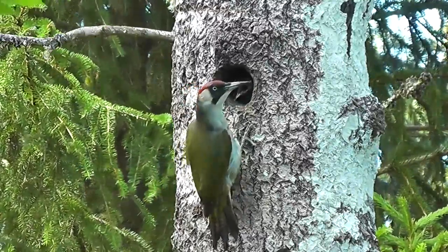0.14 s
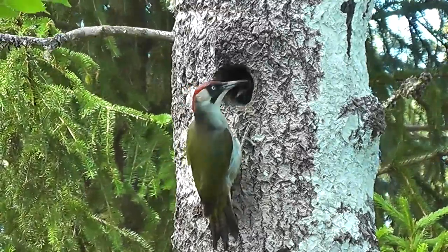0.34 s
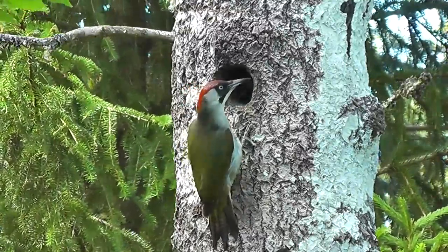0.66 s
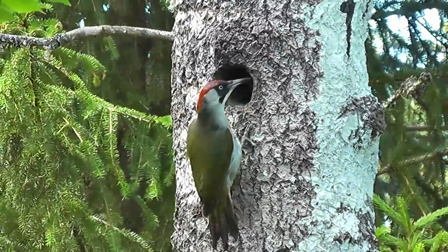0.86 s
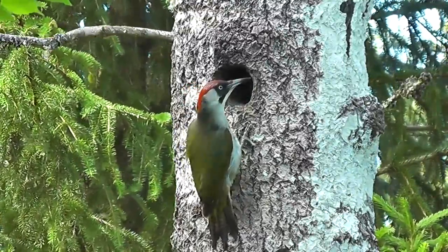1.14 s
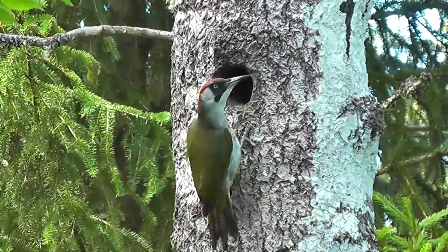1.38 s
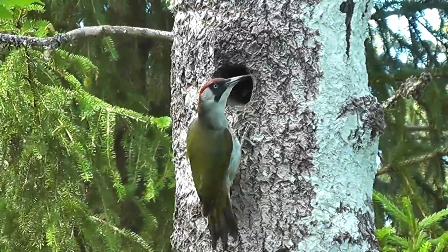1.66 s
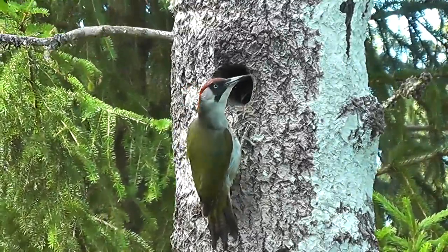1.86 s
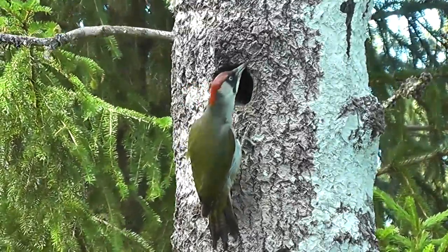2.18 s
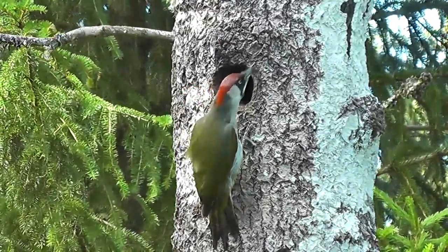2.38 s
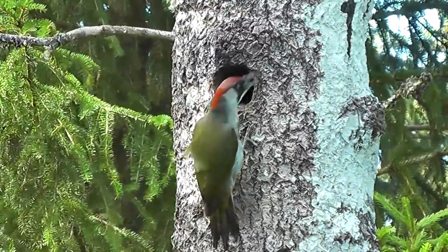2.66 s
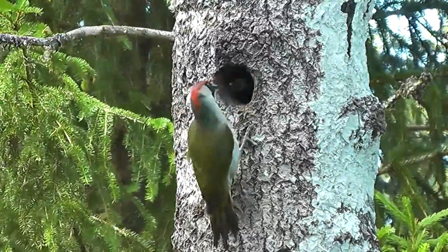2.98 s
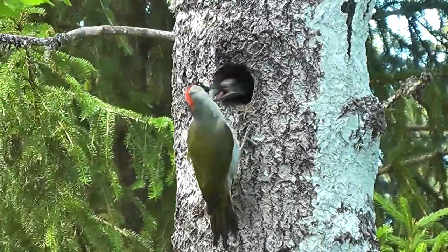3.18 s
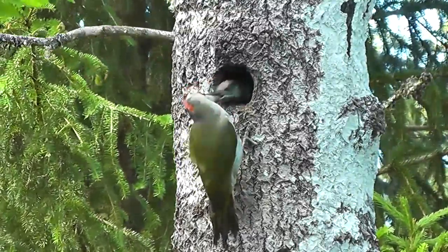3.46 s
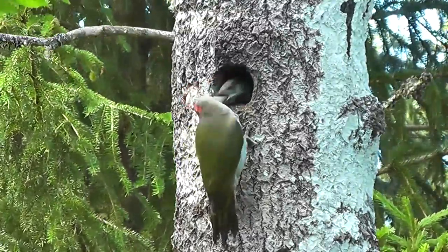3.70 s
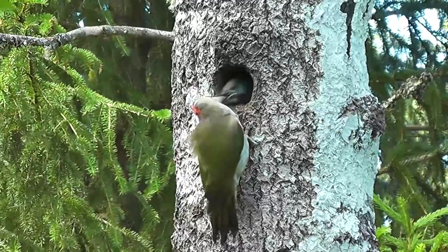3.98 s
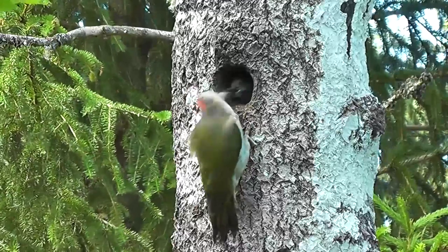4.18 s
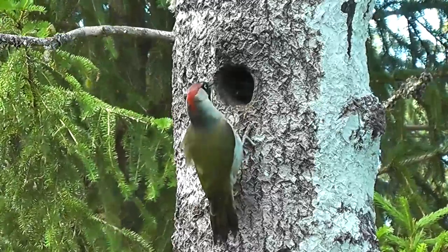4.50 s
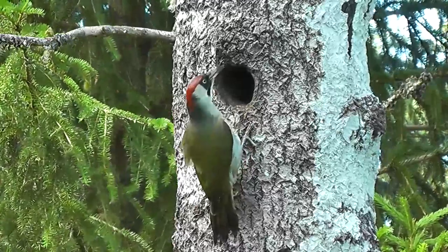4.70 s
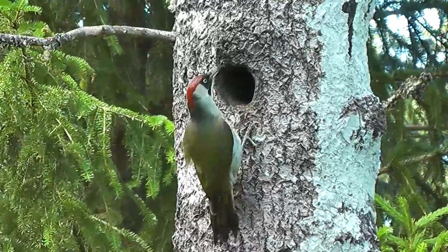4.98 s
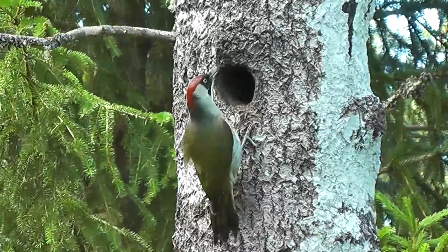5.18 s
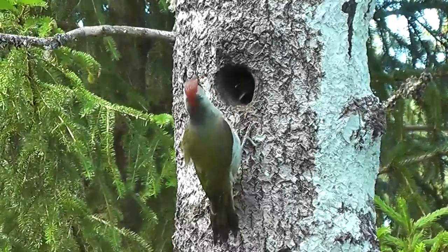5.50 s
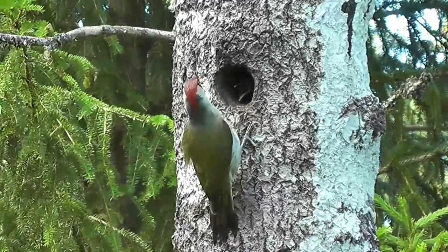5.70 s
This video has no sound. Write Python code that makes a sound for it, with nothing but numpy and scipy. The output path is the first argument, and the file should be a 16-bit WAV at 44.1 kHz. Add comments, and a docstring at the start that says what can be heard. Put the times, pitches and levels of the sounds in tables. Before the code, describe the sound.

A woodpecker nestling begs from a tree hole straight ahead, about four calls a second, each a swelling rasp ending in a short yelp. The parent faintly scuffs the bark, the chick squawks once, peeps softly while being fed, then starts begging again. Farther off, a small songbird gives thin, high whistles. The stereo microphone picks up a steady forest hush and light echoes from nearby trunks.

```python
"""A woodpecker nestling begs from its tree hole straight ahead, four calls a second, over a forest hush.
Each call is a swelling rasp of fluttering membranes that lock into a short yelp; the hollow trunk rings.
The parent scuffs the bark; the chick squawks at its bill, peeps softly while fed, then begs again.
Farther off in the spruces a small songbird whistles thinly. Nearby trunks echo the nest back to
the stereo microphone, and needles and branches scatter both birds."""
import sys
import numpy as np
from scipy import signal
from scipy.fft import rfft, irfft, next_fast_len
from scipy.io import wavfile
from scipy.ndimage import uniform_filter1d, map_coordinates

SR = 44100
rng = np.random.default_rng(int(sys.argv[2]) if len(sys.argv) > 2 else 0)


def transcribe(signal):
    """Save signal, clipped to [-1, 1], as a 16-bit WAV file at the path in sys.argv[1]."""
    frames = np.atleast_2d(signal).T
    limited = np.clip(frames, -1, 1)
    pcm = np.round(limited * 32767).astype(np.int16)
    wavfile.write(sys.argv[1], SR, pcm)


N = 257984
BAND_LIMIT_HZ, USUAL_CALL_HZ = 15750, 847

# Begging calls: start_s, break_s, yelp_length_s, rasp_db, rasp_swell_db, yelp_db, yelp_pitch_hz,
# yelp_roughness (0-1), top_formant_db, yelp_low_formant_db, yelp_main_formant_ratio.
# Levels are before the mix; the top and low formants are set against the main one.
BEGGING_CALLS = [(-.014, .065, 0.033, -34, -2, -37.5, 958, 0.4, -3.5, -3.5, .96),
                 (0.201, .318, .032, -36.5, 1.5, -36.5, 930, 0.55, -3.5, -4, 0.94),
                 (.447, 0.556, 0.027, -37.5, 6, -29.5, 979, 0.08, -3.5, -9, 0.97),
                 (.718, .776, .016, -39, 4, -45, 952, 0.37, -9, -1, 1.2),
                 (1.011, 1.087, 0.015, -51.5, 6, -51.5, 843, .6, -7.5, 5, 0.82),
                 (1.266, 1.328, .021, -49, 5, -45.5, 801, 0.45, 5, -4, 0.93),
                 (1.482, 1.545, 0.014, -46.5, 7, -37.5, 848, 0.47, -9, -4.5, 1.03),
                 (1.705, 1.826, 0.02, -38.5, 2.5, -30, 726, .02, -9, -12.5, 0.93),
                 (1.961, 2.072, 0.021, -41, 6, -33, 817, 0.39, -5.5, -6, 0.97),
                 (2.221, 2.319, 0.024, -42.5, 6, -33, 806, 0.13, -5.5, -6.5, 0.98),
                 (2.48, 2.577, .022, -43.5, 9.5, -33.5, 811, 0.2, -7, -6.5, 1),
                 (2.747, 2.852, 0.022, -42.5, 11.5, -33.5, 797, 0.09, -5, -7.5, 1),
                 (2.987, 3.077, 0.0232, -42.5, 9.5, -30, 780, 0.27, -8, -7.5, 0.97),
                 (4.853, 4.889, 0.015, -52.5, -3, -60, 824, 0.65, -5, -3, .96),
                 (5.037, 5.116, 0.015, -48, 4.5, -41.5, 878, 0.53, -3.5, -2.5, 0.93),
                 (5.312, 5.388, 0.014, -45.5, 2, -34.5, 745, 0.21, -4, -8.5, 1.01),
                 (5.58, 5.672, 0.028, -44, 4.5, -32.5, 767, .1, -5, -10, 0.98),
                 (5.806, 5.861, .02, -45, 7, -36, 800, .28, -5, -14, 0.99)]


def amp(db):
    """Decibels to gain."""
    return 10 ** (np.asarray(db) / 20)


def unit(x):
    """Scaled to rms 1."""
    return x / np.sqrt(np.mean(x ** 2) + 1e-20)


def along(points, hz):
    """Read (frequency_hz, value) points on a log frequency axis."""
    f, v = np.transpose(points)
    return np.interp(np.log(hz + 1), np.log(f + 1), v)


def wobble(n, rate):
    """A smooth random curve of n samples, rate knots a second."""
    return map_coordinates(rng.standard_normal(int(n * rate / SR) + 4), [np.arange(n) * rate / SR])


def filtered(x, response):
    """x with its spectrum multiplied by response(hz)."""
    n = x.shape[-1]
    m = next_fast_len(n + 8192)
    return irfft(rfft(x, m) * response(np.fft.rfftfreq(m, 1 / SR)), m)[..., :n]


def formant(x, shape, size=1024):
    """x rung through a causal resonance of (frequency_hz, gain_db) points, at rms 1."""
    cepstrum = irfft(np.log(amp(along(shape, np.fft.rfftfreq(size, 1 / SR)))))
    cepstrum[1:size // 2] *= 2  # fold to minimum phase
    cepstrum[size // 2 + 1:] = 0
    impulse = irfft(np.exp(rfft(cepstrum)))
    return unit(signal.fftconvolve(x, impulse)[:len(x)])


def progress(start, end):
    """A ramp 0-1 over the samples of a note."""
    return np.linspace(0, 1, max(int((end - start) * SR), 64))


def gate(n, rise, fall):
    """Soft edges for n samples; rise and fall in seconds."""
    t = np.arange(n) / SR
    return np.sin(np.pi / 2 * np.clip(np.minimum(t / rise, t[::-1] / fall), 0, 1))


def add(track, s, sound):
    """Mix a sound into the track at s seconds."""
    i = round(s * SR)
    sound, i = sound[max(-i, 0):], max(i, 0)
    track[i:i + len(sound)] += sound[:max(len(track) - i, 0)]


def syrinx(pitch, rough, jitter, shimmer_db, overtones=24):
    """The chick's voice source: pulses of unsteady rate and size, with air let through once a cycle."""
    n, rough = len(pitch), np.clip(rough, 0, 1)
    phase = 2 * np.pi * np.cumsum(pitch * np.exp(jitter * rough * wobble(n, 699))) / SR
    k = np.arange(1, overtones + 1)[:, None]
    pulses = unit(np.sum(np.cos(k * phase) * (k * pitch < BAND_LIMIT_HZ), axis=0))
    air = unit(rng.standard_normal(n) * np.exp(0.58 * np.cos(phase)))
    shimmer = amp(shimmer_db * rough * wobble(n, 406))
    return (np.sqrt(1 - rough) * pulses + np.sqrt(rough) * air) * shimmer


def throat(source, s, low_db, top_db, bill_ratio, call_hz=USUAL_CALL_HZ):
    """Three formants, shaped by the gape at time s; a closing bill lowers the main one."""
    # the formants: frequency_hz, gain_db
    low_shape = [(350, -62), (620, -12), (800, 1.5), (1250, -5.5), (1600, -0.5), (2000, -2.5), (2600, -2.5),
                 (3400, -10), (6000, -39)]
    main_shape = [(2200, -35.5), (3300, -21.5), (3800, -4), (4450, 1.5), (5150, -3.5), (5900, -10.5),
                  (6700, -21), (9000, -32.5)]
    top_shape = [(5000, -35), (6500, 0.5), (8400, 6), (9700, 2), (10900, -4.5), (13000, -15.5),
                 (15500, -41)]
    # the gape shifts slowly over the bout: time_s, main_formant_ratio, fizz_db
    gape = [(1.3, 0.97, 2), (3.08, 0.98, 13), (3.298, 0.98, 6), (5.1, 1.07, 12), (5.65, 0.97, 12)]
    times, ratios, fizzes = np.transpose(gape)
    # the higher the call, the more the low formant leans to its upper side
    lean_db = 0.0249 * (call_hz - USUAL_CALL_HZ)
    leaning = [(hz, db + lean_db * np.interp(hz, [1250, 1700], [-.5, .5])) for hz, db in low_shape]
    low = formant(source, leaning)
    main = formant(source, np.array(main_shape) * [bill_ratio * np.interp(s, times, ratios), 1])
    top = formant(source, [(hz, db + np.interp(s, times, fizzes) * (hz > 11500)) for hz, db in top_shape])
    # where the main formant sinks under the top one, the low one stands out too
    return main + amp(low_db + 1.8 * max(top_db, 0)) * low + amp(top_db) * top


def rasps(overlap_s=.017, slips_per_s=70, slip_depth=.15):
    """The membranes flutter chaotically; as pressure builds, a sinking pitch emerges from the hiss."""
    # each rasp clears as it sinks: before_break_s, pitch_hz, roughness
    contour = [(-.015, 973, .28), (.022, 1167, 0.27), (.06, 1344, .7)]
    before_s, pitches, roughs = np.transpose(contour)
    colour = [(750, -6), (1100, -3), (1900, -1), (2400, -10.5), (3400, 0), (4400, 3)]
    out = np.zeros(N)
    for start, break_s, _, db, swell_db, _, call_hz, yelp_rough, top_db, _, _ in BEGGING_CALLS:
        # the rasp lingers under a rough yelp; a clean one cuts it short
        u = progress(start, break_s + overlap_s * np.sqrt(np.clip(yelp_rough, 0, 1)))
        n = len(u)
        left_s = break_s - start - np.arange(n) / SR
        rough = np.interp(left_s, before_s, roughs) + 0.346 * yelp_rough
        # the pitch slides down and catches again
        slip = np.cumsum(slips_per_s * np.exp(.5 * wobble(n, slips_per_s))) / SR % 1
        waver = 1 + slip_depth * rough * (.5 - slip) + .04 * wobble(n, 45)
        pitch = np.interp(left_s, before_s, pitches) * waver
        source = syrinx(pitch, rough, jitter=.12, shimmer_db=0.5) * amp(1.33 * wobble(n, 228))
        source = filtered(source, lambda hz: amp(along(colour, hz)))
        low_db = -9.5 + .5 * (-35 - db)  # quieter rasps are hollower
        # the bill starts to close, so the main formant slides down
        wide, narrow = [throat(source, start, low_db, top_db, bill, call_hz) for bill in (1.025, 1.005)]
        voice = unit(wide + u ** 4 * (narrow - wide))
        level = amp(db + swell_db * np.interp(u, [.25, .86], [-.5, .5]))
        add(out, start, voice * level * gate(n, rise=0.031, fall=0.0065) ** 2)
    return out


def hush(mid_db=-51.5, patchy_db=1.02):
    """Air in the spruces all around the microphone, wide in the bass and narrow in the treble."""
    # the air's spectrum: frequency_hz, relative_db
    spectrum = [(18, -31), (58, -5), (110, -8.5), (150, -1.5), (230, -5), (450, -1.5), (850, -5),
                (1400, -10), (2400, -18), (4000, -11), (6300, -10.5), (9500, -19.5), (15500, -40.5)]
    # how alike left and right are: frequency_hz, correlation
    likeness = [(50, -0.49), (140, -0.25), (600, 0.42), (1500, 0.58), (5500, 1), (8000, 0.95),
                (12000, 0.61)]

    def mid_and_side(hz):
        """Gains of both channels: the less alike left and right, the more side."""
        angle = np.arccos(np.clip(along(likeness, hz), -1, 1)) / 2
        return amp(along(spectrum, hz)) * np.array([np.ones_like(hz), np.tan(angle)])

    noise = signal.stft(rng.standard_normal((2, N)), nperseg=512)[2]
    patches = uniform_filter1d(rng.standard_normal(noise.shape[1:]), size=6, axis=0)
    patches = uniform_filter1d(patches, size=14, axis=1)
    pair = signal.istft(noise * amp(patchy_db * unit(patches)), nperseg=512)[1][:, :N]
    mid, side = filtered(pair, mid_and_side)
    return amp(mid_db) * np.array([mid + side, mid - side]) / np.std(mid)


def trunk_echoes(x):
    """Nearby trunks return copies with the highest treble dulled."""
    # one echo a trunk, before the bark colours it: delay_s, gain_db
    echoes = [(.012, -13), (0.026, -18.5), (0.069, -26)]
    bark = [(800, 2.5), (1600, 2.5), (4000, -4), (8000, 4.5), (14000, -62)]
    delays = lambda hz: sum(amp(db) * np.exp(-2j * np.pi * hz * s) for s, db in echoes)
    return filtered(x, lambda hz: amp(along(bark, hz)) * delays(hz))


def forest_scatter(x, width):
    """Diffuse scatter from needles and branches; the treble dies first."""
    # the forest's decay: frequency_hz, t60_s
    decay = [(800, 0.55), (4000, 0.32), (8000, 0.29), (14000, 0.21)]
    hz, t, noise = signal.stft(rng.standard_normal((2, SR // 2)), SR, nperseg=256)
    tail = signal.istft(noise * amp(-60 * t / along(decay, hz)[:, None]), SR, nperseg=256)[1]
    mid, side = signal.fftconvolve(x[None], tail / np.linalg.norm(tail[0]), axes=1)[:, :N]
    return np.array([mid + width * side, mid - width * side])


def yelps():
    """Each call ends as the membranes lock into a pulse train that sags as it fades."""
    out = np.zeros(N)
    for _, start, length, _, _, db, hz, rough, top_db, low_db, bill_ratio in BEGGING_CALLS:
        u = progress(start, start + length)
        pitch = hz * (1.015 - 0.0832 * u ** 2) * (1 + 0.011 * wobble(len(u), 615))
        # the lock loosens again as the pressure runs out
        source = syrinx(pitch, rough + 0.43 * u ** 3, jitter=0.0907, shimmer_db=-0.5)
        spread_db = 5 * (rough - .2)  # rough yelps spread into the top formant
        voice = throat(source, start, low_db, top_db + spread_db, bill_ratio, call_hz=hz)
        level = amp(db + np.interp(u, [0, .4, 1], [1.7, 3.3, -7]))
        add(out, start, voice * level * gate(len(u), rise=0.0021, fall=0.0012))
    return out


def hollow_ring(x, gain_db=-9.5, t60_s=0.35):
    """Whichever overtone of a yelp falls in the nest cavity's band hangs on after it."""
    # the hollow trunk's band: frequency_hz, gain_db
    cavity = [(3050, -36), (3650, -2), (3950, -5.5), (4700, -36)]
    t = np.arange(SR // 2) / SR
    tail = rng.standard_normal(len(t)) * amp(-60 * t / t60_s)
    ring = signal.fftconvolve(x, tail / np.linalg.norm(tail))[:N]
    return amp(gain_db) * filtered(ring, lambda hz: amp(along(cavity, hz)))


def whistles(notes, shape, quaver):
    """One thin, quavering pure tone, sung again at each note's start."""
    out = np.zeros(N)
    s, hz, db = np.transpose(shape)
    t = np.arange(0, s[-1], 1 / SR)
    for start, level_db in notes:
        pitch = np.interp(t, s, hz) * (1 + quaver * wobble(len(t), 217))
        tone = unit(np.sin(2 * np.pi * np.cumsum(pitch) / SR) * amp(2.4 * wobble(len(t), 209)))
        level = amp(level_db + np.interp(t, s, db))
        add(out, start, tone * level * gate(len(t), rise=0.0039, fall=0.011))
    return out


def songbird():
    """A small bird off in the spruces whistles three short flicks, then three arches."""
    # the notes: start_s, relative_db
    flicks = [(0.867, -54), (1.41, -53.5), (4.396, -49)]
    arches = [(4.805, -44.5), (5.138, -42), (5.478, -42)]
    # their shapes: after_start_s, pitch_hz, gain_db
    flick_shape = [(0, 8420, 6.5), (0.031, 7500, -1), (.048, 8120, 5.5), (.062, 8800, 2), (.08, 9390, -8)]
    arch_shape = [(0, 7300, -6), (.065, 8280, -2.5), (.113, 8430, -1.5), (.136, 8280, -6),
                  (.152, 7810, -4.5), (.166, 7250, -13)]
    return whistles(arches, arch_shape, quaver=0.0033) + whistles(flicks, flick_shape, quaver=0.018)


def peeps():
    """Small sliding tones at the hole, between the early calls and during the feed."""
    # soft peeps: start_s, end_s, first_pitch_hz, last_pitch_hz, relative_db
    notes = [(.878, 0.915, 1440, 2370, -57), (1.221, 1.247, 2470, 2196, -42),
             (1.24, 1.253, 1090, 930, -46.5), (1.467, 1.487, 2350, 2310, -49),
             (3.696, 3.738, 2800, 1820, -59.5), (3.788, 3.822, 2030, 1725, -62),
             (3.926, 3.97, 2580, 2180, -61.5)]
    # louder peeps are richer: relative_db, step_per_overtone_db
    richness = [(-50, -6), (-46, 1)]
    out = np.zeros(N)
    for start, end, first_hz, last_hz, db in notes:
        u = progress(start, end)
        # weakly blown peeps are the scratchy ones
        scratch = np.interp(db, [-60, -46], [.09, .02]) * wobble(len(u), 1150)
        pitch = (first_hz + (last_hz - first_hz) * u ** 2.18) * (1 + scratch)
        phase = 2 * np.pi * np.cumsum(pitch) / SR
        step_db = np.interp(db, *np.transpose(richness))
        tone = sum(amp(k * step_db + colour_db) * np.sin((k + 1) * phase)
                   for k, colour_db in enumerate([-0.5, -2, -9, -19]))
        add(out, start, tone * amp(db + 6.5) * gate(len(u), rise=0.018, fall=0.0047))
    return out


def scuff(start_s=3.09, length_s=.2, level_db=-55):
    """The parent shifts against the trunk: a dull, uneven rub of feathers and claws."""
    # rubbed bark: frequency_hz, gain_db
    bark = [(120, -26), (230, -6), (370, 3), (600, -4), (1200, -35)]
    out, n = np.zeros(N), int(length_s * SR)
    rub = formant(rng.standard_normal(n) * amp(2.6 * wobble(n, 38)), bark)
    add(out, start_s, amp(level_db) * rub * gate(n, rise=0.0091, fall=0.083))
    return out


def squawk():
    """A clean squeal sweeps up, then cracks between pitches and brightens as the bill opens for food."""
    # the cry at the parent's bill: time_s, pitch_hz, level_db, roughness
    contour = [(3.236, 439.4, -52, 0.25), (3.246, 533.5, -45.5, .1), (3.261, 664, -36.5, 0.09),
               (3.274, 778, -36.5, .3), (3.291, 836, -36.5, 0.63), (3.304, 815.4, -34, 0.2),
               (3.323, 969, -33.5, .45), (3.331, 727, -33, 0.4), (3.342, 692, -33, .55),
               (3.362, 650, -44, 0.8)]
    s, *columns = np.transpose(contour)
    t = np.arange(s[0], s[-1], 1 / SR)
    pitch, db, rough = [np.interp(t, s, column) for column in columns]
    source = syrinx(pitch, rough, jitter=.09, shimmer_db=2.5)
    source = filtered(source, lambda hz: amp(along([(550, 10), (820, -1), (2300, -1), (4000, 5)], hz)))
    opening = np.linspace(0, 1, len(t)) ** 2.2
    narrow = throat(source, s[0], low_db=-5.5, top_db=-4.5, bill_ratio=0.85)
    wide = throat(source, s[-1], low_db=-10.5, top_db=-6.5, bill_ratio=1.07)
    out = np.zeros(N)
    add(out, s[0], ((1 - opening) * narrow + opening * wide) * amp(db))
    return out


def muffled_calls():
    """Two faint falling calls, muffled by a full throat."""
    # the calls: start_s, end_s, pitch_hz, relative_db, roughness
    calls = [(3.542, 3.596, 639, -54.5, 0.67), (4.707, 4.734, 830, -56, .12)]
    full_throat = [(600, -9.5), (1800, -5), (2700, -2), (5000, -7), (9000, -14), (14000, -33)]
    out = np.zeros(N)
    for start, end, hz, db, rough in calls:
        u = progress(start, end)
        source = syrinx(hz * (1 + 0.222 * (.5 - u)), rough, jitter=0.092, shimmer_db=2)
        voice = formant(source, full_throat)
        add(out, start, voice * amp(db + 4) * gate(len(u), rise=0.0055, fall=0.0073))
    return out


def microphone_pair(x):
    """A source straight ahead reaches two ports that differ a little in phase, in the lows and highs."""
    side_db = [(800, -6.5), (2000, -21), (5000, -112), (8200, -13.5), (12000, -27)]
    side = filtered(x, lambda hz: 1j * amp(along(side_db, hz)))
    return np.array([x + side, x - side])


def scene():
    """The nest near and straight ahead; the songbird farther off, with more of the forest on it."""
    endings = amp(-0.8) * yelps()
    nest = amp(2.5) * rasps() + endings + squawk() + muffled_calls() + peeps()
    song = songbird()
    near = microphone_pair(nest) + trunk_echoes(nest) + hollow_ring(endings)
    near += amp(-13) * forest_scatter(nest, width=0.22)
    far = amp(-5) * song + amp(-4.5) * forest_scatter(song, width=0.51)
    return near + far + scuff() + hush()


def record(dry):
    """The camera's microphone channel keeps nothing above its band limit."""
    return filtered(dry, lambda hz: hz < BAND_LIMIT_HZ)


dry = scene()
out = record(dry)
transcribe(out)
```